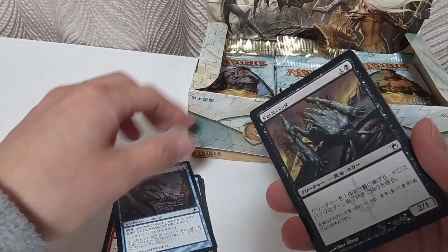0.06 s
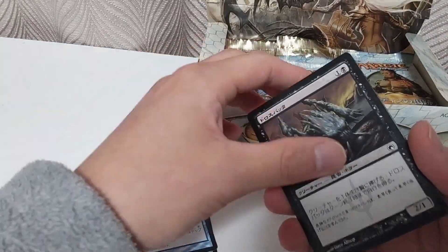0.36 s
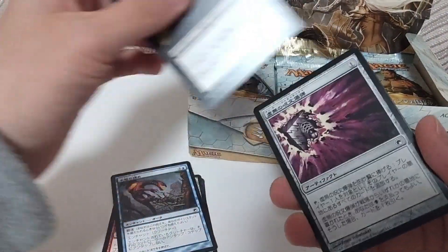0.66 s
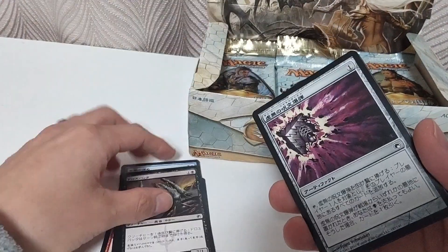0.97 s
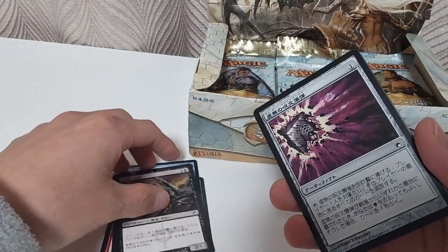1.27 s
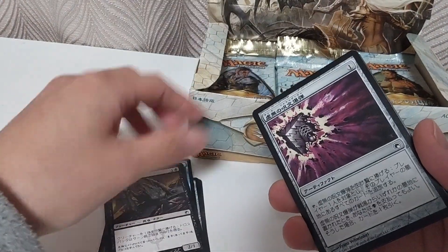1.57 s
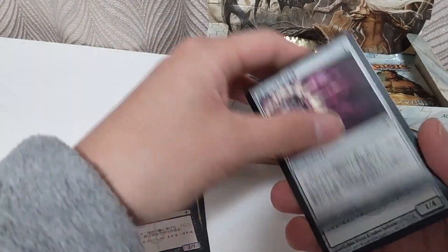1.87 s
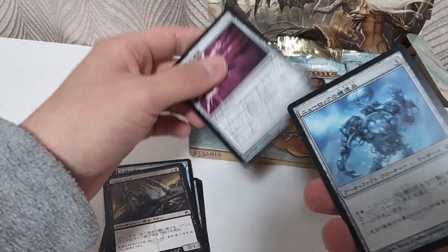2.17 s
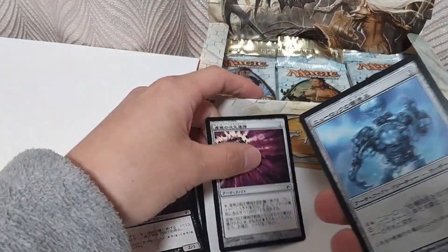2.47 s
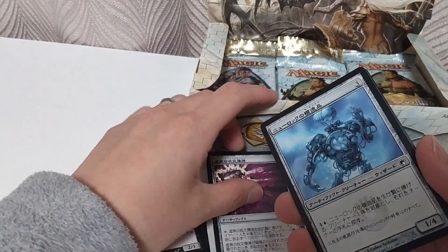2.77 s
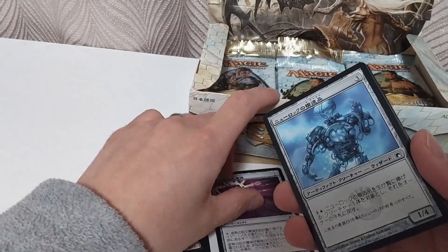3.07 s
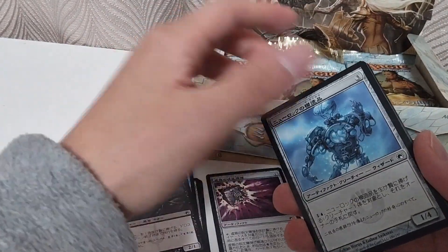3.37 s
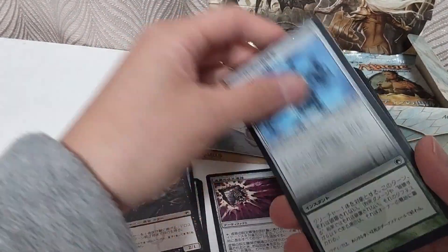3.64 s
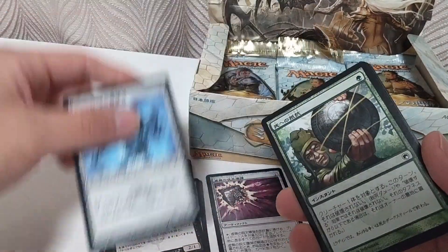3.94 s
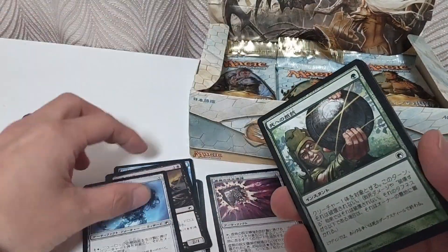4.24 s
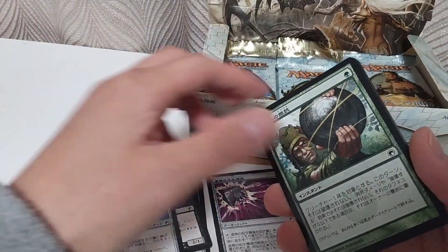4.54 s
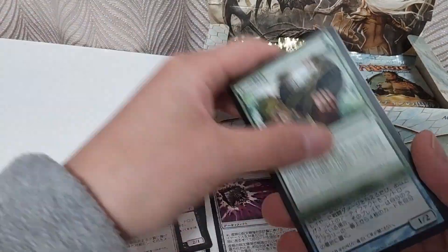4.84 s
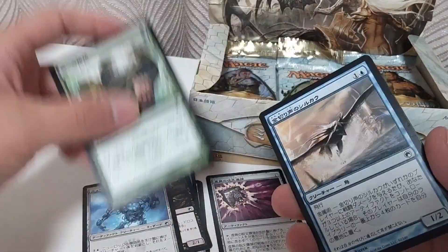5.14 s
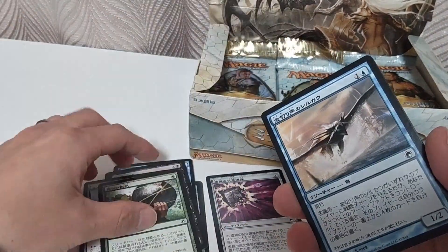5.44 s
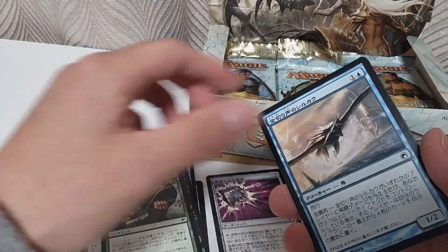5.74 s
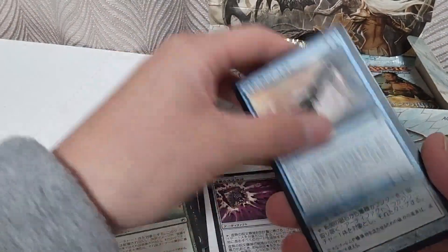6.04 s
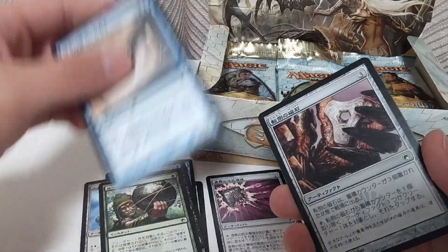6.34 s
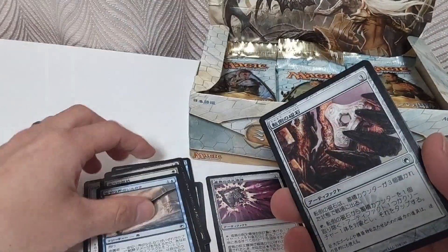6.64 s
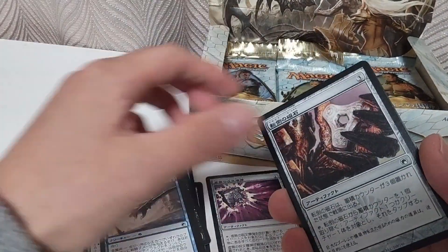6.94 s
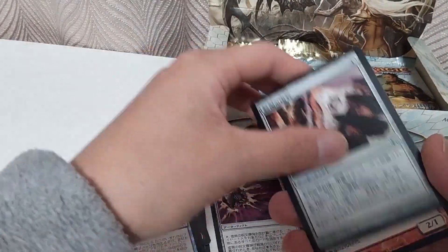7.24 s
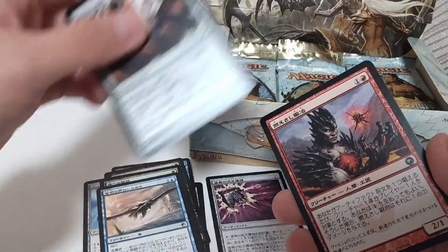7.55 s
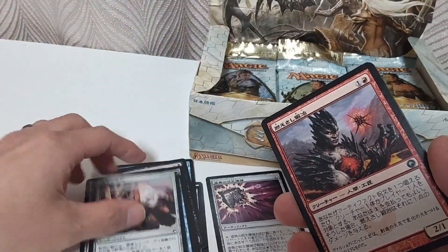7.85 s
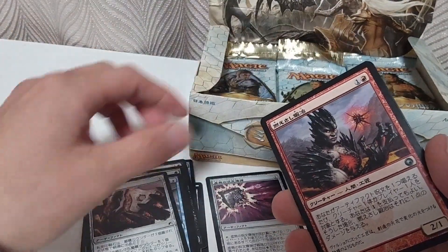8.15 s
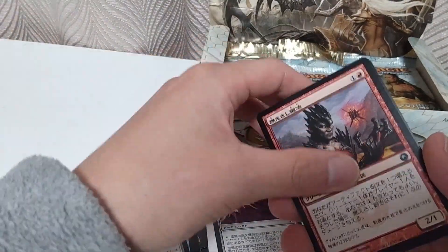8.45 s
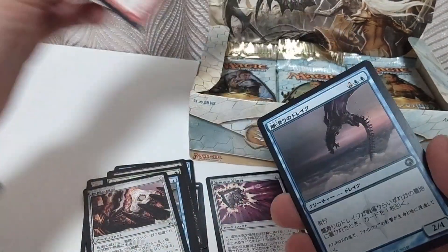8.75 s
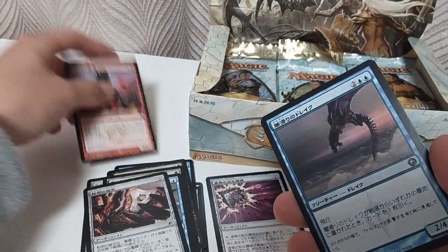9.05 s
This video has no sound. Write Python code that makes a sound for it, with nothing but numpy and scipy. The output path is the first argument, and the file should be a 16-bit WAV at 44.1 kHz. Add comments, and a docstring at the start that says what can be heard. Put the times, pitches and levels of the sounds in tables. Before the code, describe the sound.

In a quiet room, single cards slide off a stack with short papery swishes, then tap and flop onto a pile.

```python
"""In a small quiet room, a thumb drags a trading card off a hand-held stack; it swishes and flaps free.
Its edges tick on a pile on the table, it scuffs into place and flops flat. The second card is nudged
onto a new pile, where its bent corner snaps down. Midway a distant rumble dies away, while four more
cards are pulled and laid on the first pile. A last card is pulled at the end. Now and then
a faint thin whistle arches high above."""
import sys
import numpy as np
from scipy import signal
from scipy.fft import rfft, irfft, next_fast_len
from scipy.io import wavfile
from scipy.ndimage import map_coordinates

SR = 44100
rng = np.random.default_rng(int(sys.argv[2]) if len(sys.argv) > 2 else 0)


def store_pcm(level_fs):
    """Save levels as 16-bit WAV."""
    pcm = np.round(np.clip(level_fs, -1, 1) * 32767).astype(np.int16)
    wavfile.write(sys.argv[1], SR, np.atleast_2d(pcm).T)


N = 401751
PRE_S = .05  # every short sound starts with this much lead before its contact


# Tone of card sliding on card, slowly and fast: f/Hz, level/dB
DRAG_TONE = [(300, -25), (1200, -19.5), (2150, -2.5), (3200, -5.5), (4500, -3), (6500, -1), (9500, 0),
             (14000, -3.5)]
SWISH_TONE = [(200, -18), (800, -21), (1500, -9.5), (1800, -8), (2150, 0), (2800, -5.5), (3900, -1),
              (4600, -0.5), (5800, 0.5), (7500, -2), (9400, -2), (10500, -6.5), (14000, -7.5)]
# How alike left and right are for sounds at the hand: f/Hz, likeness (1 = the same)
HAND_ALIKE = [(60, 1), (180, 0.8), (550, 0.5), (1650, 0.99), (4970, 0.13), (15000, 0.02)]
# How far the left side runs ahead there: f/Hz, lead/rad
HAND_PHASE = [(1000, 0), (2300, 0), (3200, -0.35), (5000, 2), (6000, 1.1), (7200, 0.6), (14000, 1)]
# Cards leaving the stack: t/s of thumb landing, pull, coming free;
# level/dB of thumb, drag, pull, last brush, flap
PULLS = [(.432, 0.661, 0.7123, -63, -50.5, -39.5, -55, -45),
         (1.891, 2.065, 2.12, -55.5, -48.2, -44.2, -54, -60),
         (3.569, 3.758, 3.825, -57.5, -49.5, -39, -51.5, -55),
         (4.778, 4.99, 5.052, -53, -47, -37, -69, -47),
         (6.023, 6.225, 6.285, -53, -47.5, -37.5, -50, -40.5),
         (7.233, 7.459, 7.486, -58, -49.5, -34.5, -42, -47.5),
         (8.5144, 8.721, 8.776, -56, -49.5, -34, -55, -40)]

def pulls(brush_s=.022, usual_pull_db=-38, pan_db=-1.7):
    """The thumb eases the top card forward, the hand whips it off, its far edge brushes the stack."""
    t = np.arange(SR // 3) / SR - PRE_S
    hz = grid(len(t))
    for thumb, pull, free, _, drag_db, pull_db, brush_db, _ in PULLS:
        start = thumb + .37 * (pull - thumb)  # the card begins to creep
        force_db = pull_db - usual_pull_db  # a harder pull is brighter and thinner
        grip = flexing(hz, depth_db=2.5, spacing_hz=281.8)
        grip += tilt(hz, body_db=-.6 * force_db, treble_db=1.86 + .55 * force_db)
        creep_db = np.interp(t / (pull - start), [0, .65, 1], [-10, 0, -2.5])
        drag = rub(fibres(len(t), rough=.22), along(DRAG_TONE, hz) + grip)
        drag *= amp(drag_db + creep_db) * stroke(t, pull - start, rise=.006, fall=.0071)
        # faster sliding is louder
        speed_db = np.interp(t / (free - pull), [0, .25, .6, 1], [-1.5, .84, 1, -.62])
        judder_db = .85 * wobble((t - t[0]) * 260)
        whip = amp(pull_db + speed_db + judder_db) * stroke(t, free - pull, rise=.0073, fall=.0036)
        brush = amp(brush_db) * stroke(t - (free - pull), brush_s, rise=.004, fall=.0067)
        swish = rub(fibres(len(t), rough=.28), along(SWISH_TONE, hz) + grip) * (whip + brush)
        yield start, stereo(drag, HAND_ALIKE, HAND_PHASE, pan_db)
        yield pull, stereo(swish, HAND_ALIKE, HAND_PHASE, pan_db)


# Kinds of touch: body level/dB, treble level/dB, ring f/Hz, fade t/s, left-right balance/dB
TOUCH = {"thumb": (3, -6.5, 5600, .0095, -6), "edge": (3, -7.5, 6000, .02, -1),
         "corner": (3.5, -6, 1750, 0.03, -2)}
# A card's face meeting the pile: treble level/dB, ring f/Hz, fade t/s, left-right balance/dB
SLAP = (-2, 5200, 0.01, -2.5)
# Kinds of rubbing: body level/dB, treble level/dB, left-right balance/dB
RUB = {"skid": (0, -4, 0.9), "settle": (0, -4, .5), "fingers": (2.2, -2.5, -.5)}
# How far the left side runs ahead at the first pile: f/Hz, lead/rad
PILE_PHASE = [(100, 0.5), (700, 0.58), (1500, 1.08), (2800, 2.52), (4500, 4.16), (7000, 4.56), (14000, 5.1)]
# Cards landing: t/s of edge touch, corner touch, skid peak, lying flat;
# level/dB of edge, corner, skid, settling, slap, slap's body, flop; flop f/Hz
LANDINGS = [(.979, .99, 1.03, 1.067, -36.5, -33.5, -45.5, -45, -40.5, -2, -39.5, 370),
            (4.106, 4.1187, 4.19, 4.2245, -35.5, -50, -47, -41.5, -31.5, 12, -34, 365),
            (5.3848, 5.3916, 5.403, 5.4677, -33, -31.5, -47, -37, -33.5, -3, -34, 380),
            (6.6209, 6.63, 6.688, 6.7127, -36.5, -43, -41, -41, -39.5, -2, -36, 390),
            (7.8695, 7.8797, 7.929, 7.9858, -38, -36, -45.5, -51, -36, -5, -31, 392)]

def landings(flop_lag_s=.00401, skid_s=.034, settle_s=.014):
    """Edge, then corner touch the pile; the card skids, rubs as it settles, slaps flat and wobbles."""
    for edge, corner, skid, flat, *levels, flop_hz in LANDINGS:
        edge_db, corner_db, skid_db, settle_db, slap_db, body_db, flop_db = levels
        yield edge, tap(edge_db, *TOUCH["edge"], PILE_PHASE)
        # the touch bends the card
        yield edge + flop_lag_s, flop(edge_db - 8, pitch_hz=290, overtones_db=4, t60=.033)
        yield corner, tap(corner_db, *TOUCH["corner"], PILE_PHASE)
        # light sliding all the way, with one stronger skid
        yield corner, scuff(flat - corner, -54, *RUB["skid"], PILE_PHASE, rise=.003)
        yield skid - skid_s / 2, scuff(skid_s, skid_db, *RUB["skid"], PILE_PHASE, rise=.0045)
        yield flat - settle_s, scuff(settle_s, settle_db, *RUB["settle"], PILE_PHASE)
        yield flat, tap(slap_db, body_db, *SLAP, PILE_PHASE)
        yield flat + flop_lag_s, flop(flop_db, flop_hz, overtones_db=-7.5)  # the pile dulls the wobble


# How far the left side runs ahead at the new pile: f/Hz, lead/rad
NEW_PILE_PHASE = [(1000, 0), (2000, -.3), (2500, -2), (3500, -2.5), (6000, -1.5), (14000, -1.5)]
# Two corners strike, the card falls flat, its bent corner snaps down: t/s, level/dB, body level/dB,
# treble level/dB, ring f/Hz, fade t/s, left-right balance/dB, flop level/dB, flop f/Hz
SNAPS = [(2.272, -30.5, -0.5, -9.5, 2680, 0.033, -7, -46, 333),
         (2.2737, -25.5, -1, -13, 2700, .018, -.5, -48, 330),
         (2.292, -31, 7, -10, 1900, .014, -2, -32.5, 323),
         (2.9673, -25, -6, -5.5, 3020, 0.0096, -8, -39, 372)]
# Small pushes across the table: start t/s, end t/s, level/dB, body level/dB
NUDGES = [(2.466, 2.532, -47, 6), (2.579, 2.661, -48.3, 7), (2.664, 2.805, -53.5, 3.5),
          (2.81, 2.853, -49.5, -2.5), (2.849, 2.878, -44, -6), (2.947, 2.958, -43, 0)]

def new_pile(flop_lag_s=.00276):
    """The second card is snapped down and nudged; on the bare table it flops sooner and brighter."""
    for s, db, body_db, treble_db, ring_hz, t60, pan_db, flop_db, flop_hz in SNAPS:
        yield s, tap(db, body_db, treble_db, ring_hz, t60, pan_db, NEW_PILE_PHASE)
        yield s + flop_lag_s, flop(flop_db, flop_hz, overtones_db=6)
    for start, end, db, body_db in NUDGES:
        yield start, scuff(end - start, db, body_db, treble_db=-13.5, pan_db=-2, phase=NEW_PILE_PHASE)


# The ring of a card that catches: f/Hz, fade t/s, left-right balance/dB
CATCH_RING = (1960, .018, -2.5)
# A sliding card catches on an edge: t/s, level/dB, body level/dB, treble level/dB
CATCHES = [(1.008, -31.5, -12, -29), (1.062, -38, -1, -4), (1.0755, -43.5, 2, -5),
           (2.4733, -38.5, 5, -19.5), (2.482, -41.5, 12, -10), (2.498, -41, 7, -13),
           (2.559, -35, -1.5, -11), (2.5753, -39.5, -2, -13), (2.641, -44, 10, -20),
           (2.8195, -44.5, 3, -26), (2.8273, -37.5, 1.5, -23), (3.0372, -47.5, 3.5, -8),
           (3.217, -52.5, 7, -22), (4.148, -46.5, 8, -7), (4.22, -36.5, 1, 1.5), (5.388, -34, 7, -8),
           (6.6451, -40.5, 1, -1)]

def catches(new_pile_from_s=2.1, new_pile_until_s=3.3):
    """Sliding cards tick against edges, on the first pile or on the new one."""
    for s, db, body_db, treble_db in CATCHES:
        phase = NEW_PILE_PHASE if new_pile_from_s < s < new_pile_until_s else PILE_PHASE
        yield s, tap(db, body_db, treble_db, *CATCH_RING, phase)


# Fingers moving on a carried card: start t/s, end t/s, level/dB
FINGER_SHIFTS = [(0.862, .887, -62), (2.127, 2.256, -56.5), (5.127, 5.19, -58.5), (6.443, 6.496, -59.5),
                 (7.611, 7.629, -58), (8.83, 8.874, -61.5)]

def handling(flap_lead_s=.00495):
    """The thumb ticks on the stack, the card flaps as it comes free, and the fingers shift on it."""
    for thumb, _, free, thumb_db, *_, flap_db in PULLS:
        yield thumb, tap(thumb_db, *TOUCH["thumb"], HAND_PHASE)
        yield free - flap_lead_s, flop(flap_db, pitch_hz=295, overtones_db=0)
    for start, end, db in FINGER_SHIFTS:
        yield start, scuff(end - start, db, *RUB["fingers"], PILE_PHASE)


# How alike left and right are for taps and scuffs: f/Hz, likeness
CONTACT_ALIKE = [(300, 1), (2000, 1), (5000, 0.5), (12000, 0.83)]
# Tone of a card's edge striking: f/Hz, level/dB
EDGE_TONE = [(60, -21.5), (140, -10.5), (260, -1.5), (550, -0.5), (1100, 0.5), (2200, 1), (4500, 1.5),
             (7000, 1.5), (9500, 1), (11000, -5.5), (14000, -4.5)]

def tap(db, body_db, treble_db, ring_hz, t60, pan_db, phase, ring_db=6.5, brush_s=.0006):
    """An edge brushes, then cracks and chatters through the bent card, fading 60 dB in t60 seconds."""
    lead = round(PRE_S * SR)
    t = np.arange(-lead, SR // 16) / SR
    hz = grid(len(t))
    envelope = np.where(t < 0, np.exp(-abs(t) / brush_s), amp(-60 * abs(t) / t60))
    chatter = fibres(len(t), rough=.42) * envelope
    chatter[0, lead + SR // 2000] += 2 * (.012 / t60) ** 2  # the briefer the touch, the harder the crack
    ring = ring_db * np.exp(-(np.log((hz + 1) / ring_hz) / .2) ** 2)
    tone = along(EDGE_TONE, hz) + tilt(hz, body_db, treble_db) + ring
    tone += flexing(hz, depth_db=2.5, spacing_hz=201)
    hit = stereo(coloured(chatter, tone), CONTACT_ALIKE, phase, pan_db)
    first_5_ms = hit[:, lead:lead + SR // 200]
    return amp(db) * hit / np.sqrt(np.mean(first_5_ms ** 2))


# Tone of a card scuffing: f/Hz, level/dB
SCUFF_TONE = [(60, -11.5), (140, -5), (260, 3), (550, -2.5), (1050, 0), (1600, 3.5), (2200, 2.5),
              (3000, 0.5), (4500, 1), (6500, 1), (9500, -1), (14000, -8)]

def scuff(length, db, body_db, treble_db, pan_db, phase, rise=.0055, fall=.0068):
    """A card skids a little way, catching and slipping unevenly."""
    t = np.arange(SR // 3) / SR - PRE_S
    hz = grid(len(t))
    tone = along(SCUFF_TONE, hz) + tilt(hz, body_db, treble_db) + flexing(hz, depth_db=3, spacing_hz=260)
    catching = amp(2.6 * wobble((t - t[0]) * 170))
    skid = rub(fibres(len(t), rough=.46) * catching, tone)
    return stereo(skid * amp(db) * stroke(t, length, rise, fall), CONTACT_ALIKE, phase, pan_db)


# Higher notes of a wobbling card: multiple of its pitch, level/dB, fade t/s
FLOP_OVERTONES = [(2.02, -8, 0.053), (2.45, -11.5, .04), (3.4, -13, 0.047)]

def flop(db, pitch_hz, overtones_db, t60=.056, sag=.13, sag_s=.0066, attack_s=.0019):
    """The whole card wobbles briefly and unevenly; its pitch sags as it settles."""
    t = np.maximum(np.arange(SR // 4) / SR - PRE_S, 0)
    clock = t + sag * sag_s * (1 - np.exp(-t / sag_s))  # runs fast at first, so the pitch starts high

    def note(hz, fade_s):
        rattle = .78 * wobble(t * 220)
        return amp(-60 * t / fade_s) * np.sin(2 * np.pi * hz * clock + rattle)

    ring = note(pitch_hz, t60)
    for ratio, level, fade_s in FLOP_OVERTONES:
        ring += amp(level + overtones_db) * note(pitch_hz * ratio, fade_s)
    return (amp(db) * ring * (1 - np.exp(-t / attack_s)))[None]


def fibres(size, rough):
    """Paper fibres catch and let go: dense tiny slips of uneven strength."""
    slips = rng.standard_normal((2, size))
    strength = np.repeat(rng.standard_normal(size // 8 + 1), 8)[:size]
    return unit(slips * np.exp(rough * strength))


def rub(slips, tone_db):
    """The slips take on the card's tone, at a standard strength."""
    return unit(coloured(slips, tone_db)[:, :slips.shape[1]])


def flexing(hz, depth_db, spacing_hz):
    """The pitches a card favours, placed anew by every grip; they blur towards the treble."""
    return depth_db * wobble(hz / spacing_hz) / (1 + hz / 12000)


def tilt(hz, body_db, treble_db):
    """Flat contact gives body (low tones), a sharp edge gives treble (high tones)."""
    return along([(800, body_db), (1500, 0), (2800, 0), (7500, treble_db)], hz)


def stroke(t, length, rise, fall):
    """Contact that fades in around time 0 and out around the given length, all in seconds."""
    return (1 + np.tanh(t / rise)) * (1 + np.tanh((length - t) / fall)) / 4


# Weaker tones below each whistle: multiple of its pitch, level/dB
WHISTLE_UNDERTONES = [(.69, -8), (.88, -10)]
# High whistles: start t/s, end t/s, top f/Hz, level/dB
WHISTLES = [(1.6, 1.9, 8600, -86), (1.87, 2.094, 9900, -79), (2.144, 2.45, 9850, -81),
            (5.15, 5.38, 10900, -80), (5.4, 5.678, 9800, -84), (8.282, 8.53, 9950, -79),
            (8.53, 8.64, 8850, -76)]

def whistles(arch=.1, waver=.006):
    """Faint thin whistles rise and fall in pitch, wavering a little."""
    t = np.arange(SR // 2) / SR - PRE_S
    for start, end, top_hz, db in WHISTLES:
        from_top = np.clip(2 * t / (end - start) - 1, -1, 1)
        pitch_hz = top_hz * (1 - arch * from_top ** 2 + waver * wobble((t - t[0]) * 20))
        angle = 2 * np.pi * np.cumsum(pitch_hz) / SR
        tones = sum(amp(level + 3 * wobble((t - t[0]) * 30)) * np.sin(ratio * angle)
                    for ratio, level in [(1, 0)] + WHISTLE_UNDERTONES)
        yield start, (amp(db) * tones * (1 - from_top ** 4))[None]


# How long the room's echo takes to fade by 60 dB: f/Hz, t/s
ECHO_FADE = [(200, 0.21), (2000, 0.16), (6000, .15), (14000, 0.14)]

def room(x, delay_s=.005):
    """A short, soft room echo follows each sound; treble dies first."""
    out, step = np.zeros((2, N)), SR // 4
    for i in range(0, N, step):  # a fresh random echo every quarter second
        hz, t, noise = signal.stft(rng.standard_normal((2, SR // 3)), SR, nperseg=256)
        fade = amp(-60 * t / along(ECHO_FADE, hz)[:, None])
        tail = signal.istft(noise * fade, SR, nperseg=256)[1]
        tail /= np.linalg.norm(tail[0])
        add(out, i / SR + delay_s, signal.fftconvolve(x[:, i:i + step], tail, axes=1))
    return out


# Tone of the distant rumble: f/Hz, level/dB
RUMBLE_TONE = [(40, -21.5), (80, -17), (115, -5), (170, -8), (205, 0.5), (232, -2), (262, 4), (300, -10),
               (400, -7.5), (520, -12.5), (900, -7), (1600, -15.5), (2300, -19.5), (3500, -33)]

def rumble(peak_s=2.37, peak_db=-60.5, slope_db_per_s=1.22, drop_s=4.35, drop_db=6):
    """A distant rumble swells to a peak, eases off, then drops away."""
    t = np.arange(N) / SR
    dropped = (1 + np.tanh((t - drop_s) / .12)) / 2
    db = peak_db - slope_db_per_s * abs(t - peak_s) - drop_db * dropped
    return amp(db + .94 * wobble(t * 9)) * room_noise(RUMBLE_TONE)


# Tone of the low bumps: f/Hz, level/dB
BUMP_TONE = [(15, -9), (38, 0.5), (55, -5.5), (100, -28), (500, -70)]
# Each bump: t/s, level/dB, half length t/s
BUMPS = [(3.0, -70, .25), (5.2, -66, .08), (6.684, -62, 0.097), (6.98, -52.5, 0.053), (7.348, -67.5, 0.12)]

def bumps():
    """Deep noise swells briefly into dull bumps."""
    t = np.arange(N) / SR
    swells = sum(amp(db) * np.exp(-((t - s) / half) ** 2) for s, db, half in BUMPS)
    return swells * room_noise(BUMP_TONE)


# Tone of the room's steady hiss: f/Hz, level/dB
HISS_TONE = [(12, -28), (28, -5.5), (42, 0.5), (57, -4), (75, -10.5), (130, -9.5), (260, -6), (480, -10.5),
             (1000, -12.5), (1400, -15.5), (2500, -17.5), (6600, -23), (14300, -25.5)]
# How alike left and right are in the background: f/Hz, likeness
AIR_ALIKE = [(60, 0.76), (180, 0.79), (550, 0.25), (1650, -0.14), (4970, -0.044), (15000, 0.0092)]

def room_noise(tone=HISS_TONE):
    """Steady stereo noise of the given tone; left and right are most alike in the bass."""
    hz = grid(N)
    white = rfft(rng.standard_normal((2, 2 * (len(hz) - 1))))
    mid, side = white * amp(along(tone, hz)) * mid_and_side(AIR_ALIKE, hz)
    return unit(irfft([mid + side, mid - side])[:, :N])


def amp(db):
    """Turn decibels into a multiplier."""
    return 10 ** (np.asarray(db) / 20)


def unit(x):
    """Scale x to an average strength (rms) of 1."""
    return x / np.sqrt(np.mean(x ** 2) + 1e-20)


def along(points, hz):
    """Join (f/Hz, value) points into a curve on a log frequency axis."""
    f, v = np.transpose(points)
    return np.interp(np.log(hz + 1), np.log(f + 1), v)


def wobble(steps):
    """A smooth random curve with a new value at every whole step."""
    return map_coordinates(rng.standard_normal(int(steps.max()) + 4), [steps], mode="nearest")


def grid(size):
    """The frequencies used to filter a sound of this length, with padding."""
    return np.fft.rfftfreq(2 * next_fast_len(size // 2 + SR // 20), 1 / SR)


def coloured(x, db):
    """Shape the tone of x with a filter that rings only after a sound, never before it."""
    cepstrum = irfft(np.log(amp(db)))
    size = len(cepstrum)
    cepstrum[1:size // 2] *= 2
    cepstrum[size // 2 + 1:] = 0
    return irfft(rfft(x, size) * np.exp(rfft(cepstrum)))


def mid_and_side(alike, hz):
    """How much sound left and right share (mid), and how much sets them apart (side)."""
    turn = np.arccos(np.clip(along(alike, hz), 0, 1)) / 2
    return [np.cos(turn), np.sin(turn)]


def stereo(pair, alike, phase, pan_db):
    """Two unrelated signals become left and right with this likeness, lead and balance."""
    hz = np.fft.rfftfreq(pair.shape[1], 1 / SR)
    mid, side = rfft(pair) * mid_and_side(alike, hz)
    lead = np.exp(.5j * along(phase, hz))
    return irfft([(mid + side) * lead * amp(pan_db / 2), (mid - side) / lead * amp(-pan_db / 2)])


def add(track, s, sound):
    """Mix a sound into the track at s seconds."""
    part = track[:, max(round(s * SR), 0):][:, :sound.shape[1]]
    part += sound[:, :part.shape[1]]


def played(sounds):
    """Lay (contact time, sound) pairs on a stereo track."""
    out = np.zeros((2, N))
    for s, sound in sounds:
        add(out, s - PRE_S, sound)
    return out


def scene():
    """Cards in the hand and on the table, their echo, and the quiet background."""
    swishes = played(pulls())
    contacts = played(handling()) + played(landings()) + played(new_pile()) + played(catches())
    echo = room(amp(-16.5) * swishes + amp(-12.2) * contacts)
    background = played(whistles()) + rumble() + bumps() + amp(-64) * room_noise()
    return swishes + contacts + echo + background


def record(dry):
    """The nearby phone cuts off the very highest treble."""
    hz, top_hz = grid(N), 14450
    spectrum = rfft(dry, 2 * (len(hz) - 1))
    return irfft(spectrum / (1 + (hz / top_hz) ** 200))[:, :N]


dry = scene()
out = record(dry)
store_pcm(out)
```